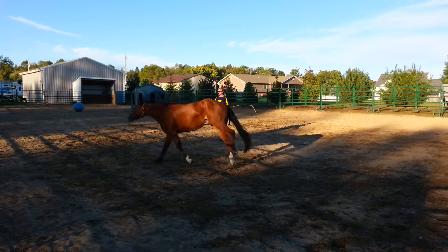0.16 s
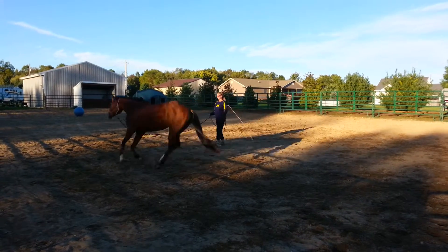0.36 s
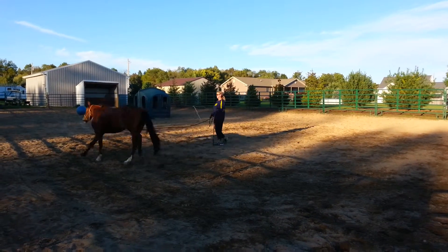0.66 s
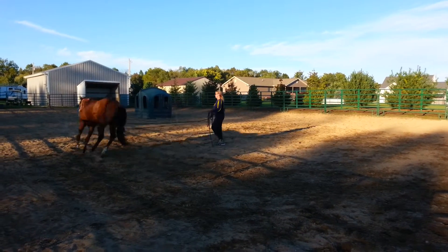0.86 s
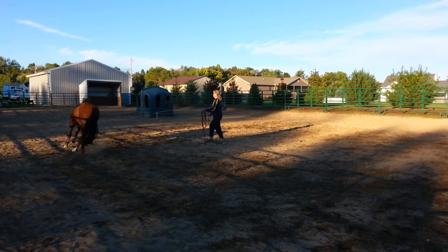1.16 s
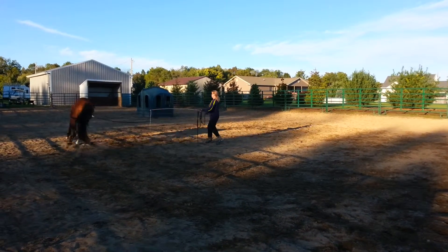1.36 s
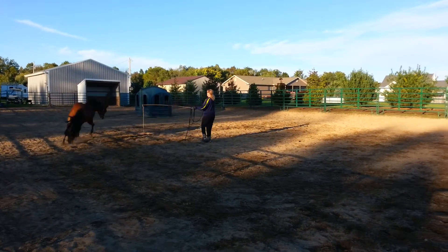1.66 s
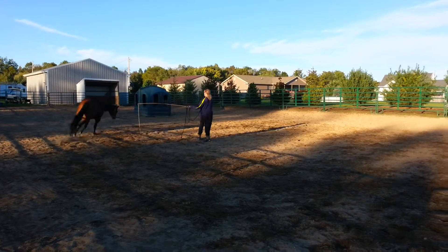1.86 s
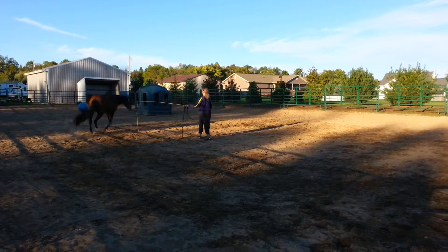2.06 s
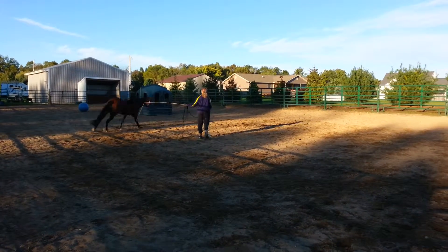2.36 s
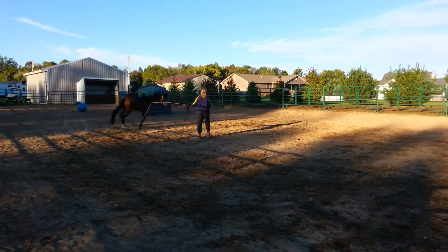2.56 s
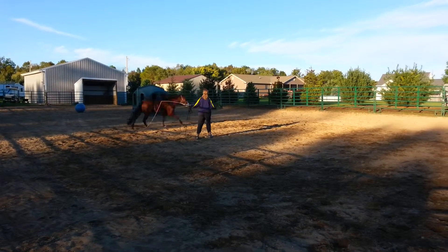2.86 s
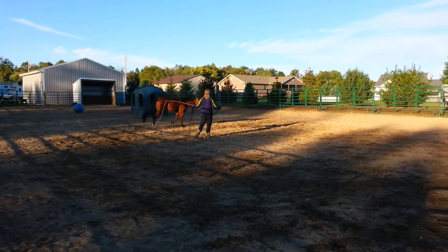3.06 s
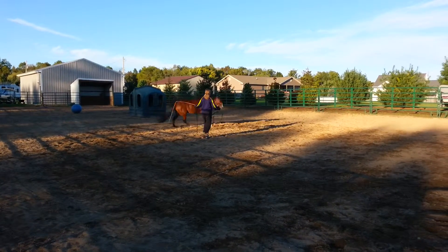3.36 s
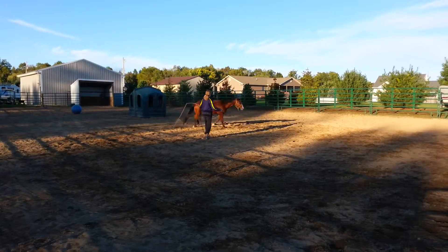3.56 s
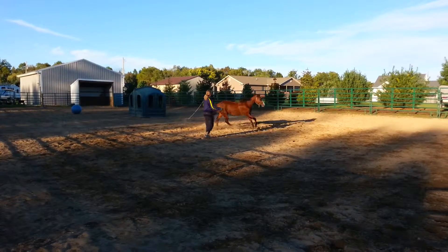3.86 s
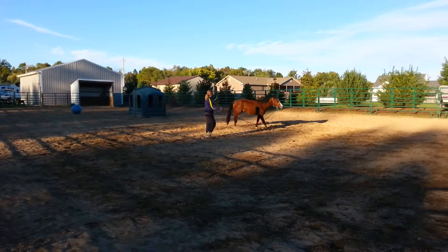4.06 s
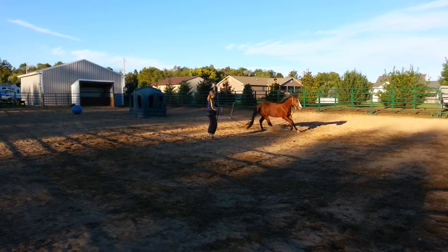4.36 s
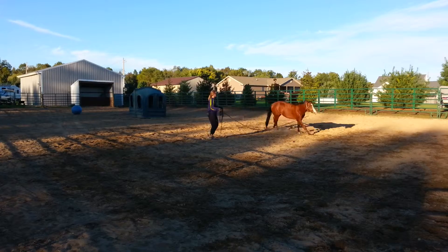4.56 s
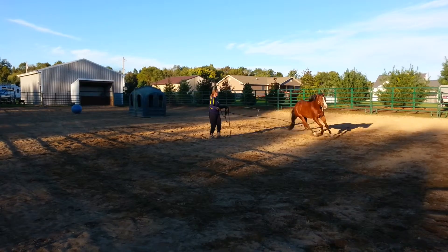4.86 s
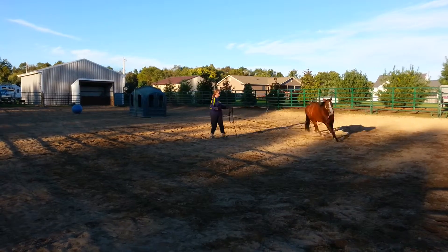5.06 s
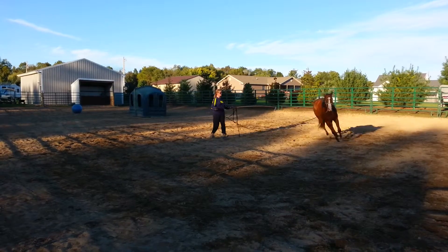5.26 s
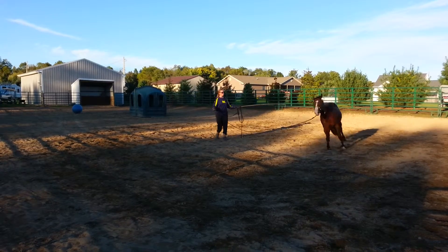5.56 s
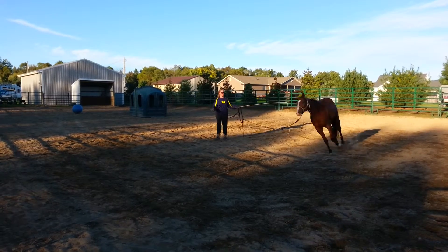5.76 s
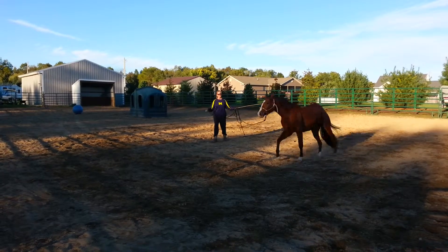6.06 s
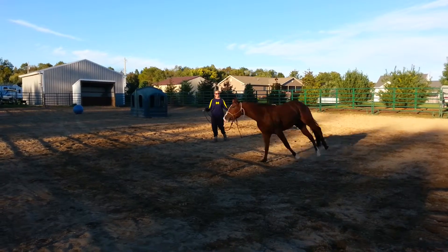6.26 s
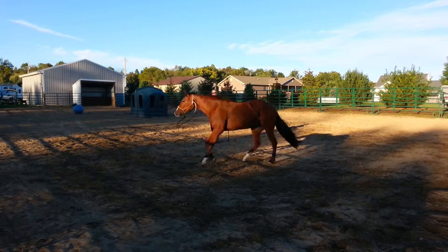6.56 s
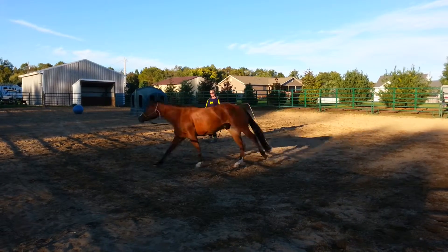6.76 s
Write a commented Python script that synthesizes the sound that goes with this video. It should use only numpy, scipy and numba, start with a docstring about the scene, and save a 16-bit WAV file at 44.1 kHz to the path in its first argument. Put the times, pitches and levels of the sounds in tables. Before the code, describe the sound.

Wind buffets the microphone over far traffic, then eases as a cantering horse's soft hoof thuds and sand spray come through, with tiny bird chirps.

```python
"""A sand paddock beside far traffic, heard from the rail by a microphone with two ports.
A horse canters on a line: hooves thud (falling sines, noise) and throw sand (coloured grains).
The snap hook of the line jingles (decaying steel modes) and small birds call (gliding sines).
A breeze buffets the ports, the left one most (swirling grains), then dies down over the traffic
and a soft hiss (both filtered noise)."""
import sys
import numpy as np
from scipy import signal
from scipy.fft import rfft, irfft
from scipy.io import wavfile
from scipy.ndimage import uniform_filter1d
from numba import njit

SR = 44100
rng = np.random.default_rng(int(sys.argv[2]) if len(sys.argv) > 2 else 0)


def wav_out(sig):
    """Save sig, one row per channel (or a flat mono array), as 16-bit PCM at SR to the path in sys.argv[1]."""
    wavfile.write(sys.argv[1], SR, np.round(np.clip(np.atleast_2d(sig).T, -1, 1) * 32767).astype(np.int16))


N = 305172
T = np.arange(N) / SR
RIGHT_LAG = 18  # samples by which sound reaches the right port later


def undb(db):
    """Gain of a level in dB."""
    return 10 ** (np.asarray(db) / 20)


def unit(x):
    """Scale to rms 1."""
    return x / np.sqrt(np.mean(x ** 2))


def curves(table):
    """Columns of a time table, interpolated to one value a sample."""
    s, *columns = np.transpose(table)
    return [np.interp(T, s, c) for c in columns]


def colour(x, points):
    """Filter a noise through (frequency [Hz], gain [dB]) points, falling steeply beyond the ends."""
    hz, db = np.transpose(points)
    log_hz = np.log(np.maximum(np.arange(N // 2 + 1) * SR / N, 1))
    below = np.maximum(np.log(hz[0]) - log_hz, 0)
    above = np.maximum(log_hz - np.log(hz[-1]), 0)
    gain_db = np.interp(log_hz, np.log(hz), db) - 10.7 * (below + above)
    return irfft(rfft(x) * undb(gain_db), N)


@njit
def svf(x, hz, q):
    """State-variable band-pass with a moving centre, gain 1 there."""
    y, b, l = np.empty(len(x)), 0., 0.
    for i in range(len(x)):
        g = np.tan(np.pi * hz[i] / SR)
        v = (b + g * (x[i] - l)) / (1 + g * (g + 1 / q))
        b, l, y[i] = 2 * v - b, l + 2 * g * v, v / q
    return y


def band(x, hz, width_hz):
    """Fixed band-pass."""
    return svf(x, np.full(N, 1. * hz), hz / width_hz)


def walk(rate):
    """Random levels held 1 / rate s, then smoothed twice; spread near 1."""
    hold = int(SR / rate)
    steps = np.repeat(rng.standard_normal(N // hold + 1), hold)
    return 1.93 * uniform_filter1d(uniform_filter1d(steps, hold), hold)[:N]


def grains(rate, spread_db):
    """Scattered clicks of very uneven size, about rate of them a second, rms 1."""
    hit = rng.random(N) < rate / SR
    return unit(hit * rng.choice([-1, 1], N) * undb(spread_db * rng.exponential(size=N)))


def add(out, s, x):
    """Mix x in from time s."""
    i = max(int(s * SR), 0)
    out[..., i:i + x.shape[-1]] += x[..., :N - i]


def burst(t60, rise):
    """Time and envelope that swells for about rise s, then dies away by 60 dB in t60 s; peak 1."""
    t = np.arange(int(.4 * SR)) / SR
    swell = (1 - np.exp(-t / max(rise, 1e-4))) ** 2
    shape = swell * np.exp(-np.log(1000) * t / max(t60, .002))
    return t, shape / shape.max()


# traffic spectrum: (frequency [Hz], gain [dB])
TRAFFIC_COLOUR = [(40, 10.5), (70, 7), (120, 2.5), (270, 0), (400, -6.5), (950, -11), (1400, -9),
                  (2500, -26.5), (4000, -29.5)]
# tyre roar sinks in pitch as a far car passes, another follows: (time [s], centre [Hz])
TYRE_ROAR = [(0, 802), (2.35, 693), (2.7, 610), (4.0, 640), (4.7, 710)]
ROAR_Q, ROAR_DB = 2.15, 10


def drone():
    """Tyre and engine noise from far off: each slice of the spectrum wavers on its own."""
    noise = rng.standard_normal(N)
    wavering = np.zeros(N)
    for k, hz in enumerate(40 * 2 ** np.arange(0, 7, 1 / 3)):  # third octaves
        waver_db = min(2.1, 1000 / hz) * walk(12)
        # neighbouring slices in opposite phase
        wavering += (-1) ** k * band(noise, hz, hz / 4) * undb(waver_db)
    rumble = colour(wavering, TRAFFIC_COLOUR)
    roar_hz, = curves(TYRE_ROAR)
    roar = svf(svf(rumble, roar_hz, ROAR_Q), roar_hz, ROAR_Q)
    return unit(rumble + undb(ROAR_DB) * roar)


# hiss spectrum: (frequency [Hz], gain [dB])
HISS_COLOUR = [(1800, 2), (4400, 0), (6000, -1.5), (10000, -2.5), (14000, -5.5)]
# far background: (time [s], traffic gain [dB], hiss gain [dB])
FAR_LEVELS = [(0, -48.5, -67.5), (.9, -59, -70), (1.5, -60.5, -66), (1.9, -54, -66), (2, -54.5, -73.5),
              (2.55, -59, -69.5), (2.95, -57.5, -68), (3.2, -59, -67.5), (4.1, -64.5, -69),
              (5.3, -66, -72.5), (5.6, -66.5, -71.5), (6.92, -68.5, -74.5)]


def far():
    """Traffic partly shared by the ports, late at the right, and a hiss that comes from all round."""
    traffic_db, hiss_db = curves(FAR_LEVELS)
    ahead, left, right = drone(), drone(), drone()
    hiss = np.array([unit(colour(rng.standard_normal(N), HISS_COLOUR)) for _ in range(2)])
    road = np.array([ahead + 0.98 * left, np.roll(ahead, RIGHT_LAG) + 0.27 * right])
    sway_db, flicker_db = 1.6 * walk(16), 0.9 * walk(20)
    return road * undb(traffic_db + sway_db) + hiss * undb(hiss_db + flicker_db)


# air between the puffs: (time [s], left level [dB], right level [dB])
AIR_LEVELS = [(0, -48, -55), (.9, -53, -51.5), (1.13, -66, -65), (1.4, -36, -48.5), (2.1, -52, -66),
              (2.7, -84, -61.5), (3.4, -93, -61.5), (4.1, -71.5, -68)]
# puffs of wind on one port: (time at full level [s], hold [s], level [dB], port [0 left, 1 right])
WIND_PUFFS = [(0.0, 0.043, -31.5, 0), (0.046, 0.04, -28, 0), (0.073, 0.096, -46.5, 1),
              (0.162, 0.069, -28, 0), (0.286, 0.034, -36, 0), (0.462, 0.05, -35.5, 0),
              (0.507, 0.13, -51, 1), (0.588, 0.031, -38, 0), (0.725, 0.012, -35.5, 0),
              (0.823, 0.041, -36.5, 0), (1.028, 0.042, -44, 0), (1.176, 0.014, -33, 0),
              (1.187, 0.054, -44.5, 1), (1.262, 0.17, -32, 0), (1.503, 0.16, -32.5, 0),
              (1.662, 0.089, -43, 1), (1.692, 0.089, -38.5, 0), (1.888, 0.046, -42.5, 1),
              (2.194, 0.15, -35, 0), (2.337, 0.033, -41.5, 1), (2.498, 0.019, -39, 0),
              (3.475, 0.027, -39.5, 0), (3.592, 0.047, -44, 0), (3.604, 0.031, -40.5, 1)]
PUFF_RISE_DB_S, PUFF_FALL_DB_S = 797, 340  # dB per second


def wind_db():
    """Wind level on each port: slowly changing air plus puffs that rise, hold and fall away."""
    power = undb(curves(AIR_LEVELS)) ** 2
    for s, hold, db, port in WIND_PUFFS:
        rise_db = PUFF_RISE_DB_S * np.maximum(s - T, 0)
        fall_db = PUFF_FALL_DB_S * np.maximum(T - s - hold, 0)
        power[int(round(port))] += undb(db - rise_db - fall_db) ** 2
    return 10 * np.log10(power)


# strongest single eddies: (time [s], level before filtering [dB], pitch [Hz], port [0 left, 1 right])
STRONG_EDDIES = [(0.062, -18, 170, 0), (0.177, -19.5, 191, 0), (0.217, -20.5, 140, 0),
                 (0.324, -16.5, 162, 0), (0.36, -20.5, 125, 0), (1.19, -16.5, 182, 0), (1.292, -20, 110, 0),
                 (1.325, -13.5, 133, 0), (1.412, -14.5, 181, 0), (1.533, -16.5, 123, 0),
                 (1.563, -14.5, 197, 0), (1.586, -19.5, 198, 0), (1.667, -18, 201, 0), (1.921, -25, 161, 1),
                 (2.215, -22.5, 140, 0), (2.304, -27, 140, 0), (2.862, -35, 125, 0), (2.923, -38.5, 170, 0),
                 (3.007, -30.5, 132, 1), (3.5, -25, 140, 0)]


def breeze():
    """Eddies tumble past each port on their own; a stronger gust swirls higher and rustles at the rim."""
    out, rustle = np.zeros((2, 2, N))
    for port, rim, db in zip(out, rustle, wind_db()):
        swirl_hz = np.clip(75 * 2 ** ((db + 46.0) / 40 + 0.22 * walk(24.95)), 40, 400)
        eddies = unit(svf(svf(grains(170, 3.77), swirl_hz, 1.0), swirl_hz, 0.89))
        heave = unit(band(rng.standard_normal(N), 60, 33))
        # the port chokes on the largest swings
        choked = 2.74 * np.tanh(eddies / 2.32)
        port += (choked + undb(-7.0) * heave) * undb(db)
        rim += unit(band(grains(3000, 2.3), 870, 630)) * undb(0.51 * db - 43.5)
    for s, db, hz, port in STRONG_EDDIES:
        t = np.arange(-SR // 50, SR // 50) / SR
        swirl = np.exp(-(t * hz / 0.45) ** 2) * np.sin(2 * np.pi * hz * t - 0.6)
        add(out[int(round(port))], s - .021, undb(db) * swirl)
    low_pass = signal.butter(4, 430, fs=SR, output="sos")
    return signal.sosfilt(low_pass, out) + rustle


# bird notes: (time [s], length [s], start pitch [Hz], end pitch [Hz], level before the waver [dB])
BIRD_NOTES = [(0.006, 0.035, 8500, 8200, -63.5), (0.036, 0.026, 8200, 8540, -60),
              (1.839, 0.054, 9050, 8270, -65), (2.89, 0.07, 4100, 3980, -75),
              (3.155, 0.035, 7450, 7380, -66), (3.285, 0.06, 3980, 3840, -73),
              (3.854, 0.05, 3980, 4100, -76), (4.845, 0.03, 3520, 3610, -72),
              (5.722, 0.032, 7150, 6850, -65), (6.662, 0.02, 3930, 3900, -74)]


def birds():
    """Thin whistles that glide quickly at first, then level off, never quite steady."""
    out, waver = np.zeros(N), walk(120)
    for s, length, start_hz, end_hz, db in BIRD_NOTES:
        n = int(length * SR)
        shake = waver[int(s * SR):][:n]
        glide_hz = end_hz + (start_hz - end_hz) * np.linspace(1, 0, n) ** 2
        hz = glide_hz * (1 + .012 * shake)
        whistle = np.hanning(n) * np.sin(2 * np.pi * np.cumsum(hz) / SR)
        add(out, s, undb(db + 1.6 * shake[::-1]) * whistle)
    return out


# steel modes of the snap hook: (frequency [Hz], relative level [dB], t60 [s])
HOOK_MODES = [(6970, -6.5, 0.027), (7450, 0, 0.029), (8120, -13, 0.03), (9590, -0.5, 0.029),
              (11700, -19, 0.03), (12720, -33, 0.21)]
# the hook knocks its ring: (time [s], level before the mode mix [dB], brightness [dB per octave])
HOOK_KNOCKS = [(0.586, -56.5, -8), (0.606, -60, 27), (0.8664, -57.5, 28), (1.5878, -58.5, 18),
               (2.05, -64.5, -3), (3.217, -56, -24), (6.224, -70, 32), (6.4208, -47.5, 3), (6.557, -67, 22)]


def hook():
    """Every knock rings the same steel modes, each time in another mix."""
    out = np.zeros(N)
    mix = rng.standard_normal((len(HOOK_KNOCKS), len(HOOK_MODES)))
    for (s, db, bright_db), row in zip(HOOK_KNOCKS, mix):
        for (hz, mode_db, t60), chance in zip(HOOK_MODES, row):
            t, shape = burst(t60, 0.00035)
            tilt_db = bright_db * np.log2(hz / 7600)
            ring = shape * np.sin(2 * np.pi * hz * t + chance)
            add(out, s, undb(db + mode_db + tilt_db + 1.6 * chance) * ring)
    return out


# sand spectrum: (frequency [Hz], gain [dB])
SAND_COLOUR = [(700, 7), (1500, -0.5), (3000, 0.5), (6000, -0.5), (10000, -2), (14000, -8.5)]
# sand thrown by the hooves:
# (time [s], shower level [dB], decay t60 [s], first crack above the shower, before its filter [dB])
SAND_SPRAYS = [(0.368, -51, 0.033, -6.5), (0.5724, -56.5, 0.19, 4), (0.8072, -60, 0.11, -1),
               (0.856, -60.5, 0.25, 8), (0.977, -61, 0.087, 7), (1.023, -65, 0.23, 18.5),
               (1.19, -61, 0.12, 4), (1.422, -66, 0.098, 14.5), (1.551, -58, 0.16, 8),
               (1.8542, -71, 0.37, 17), (2.2325, -60.5, 0.13, -5), (3.02, -65.5, 0.089, -2),
               (3.152, -61, 0.11, 4), (3.219, -61, 0.19, 11), (3.537, -62, 0.095, 12.5),
               (3.7402, -67, 0.11, 13), (4.0694, -60.5, 0.12, 15), (4.155, -64, 0.18, 17.5),
               (4.647, -69, 0.071, 15), (4.711, -70, 0.057, 5), (4.797, -70, 0.13, 6),
               (4.818, -64.5, 0.19, 16.5), (4.9404, -64.5, 1, 14.5), (5.155, -64.5, 0.72, 10.5),
               (5.392, -66.5, 0.1, 2), (5.65, -68.5, 0.06, 14), (5.668, -63, 0.048, 5),
               (5.682, -62.5, 0.046, 15.5), (5.901, -66, 0.17, 3), (6.098, -63, 0.12, 15),
               (6.224, -59, 0.11, 20.5), (6.411, -54.5, 0.13, -6), (6.548, -64.5, 0.067, 3),
               (6.88, -65, 0.035, -6)]
SCUFF_DB, SCUFF_SPREAD_DB = -73, 7  # softest scuff, range above it


def sprays():
    """A clod cracks apart, then grains shower over a wide patch, so each port hears its own."""
    shower, crack = np.zeros(N), np.zeros(N)
    for s, db, t60, crack_db in SAND_SPRAYS:
        add(shower, s, undb(db) * burst(t60, 0.0069)[1])
        add(crack, s + 0.00157, undb(db + crack_db) * burst(0.0085, 0.0001)[1])
    # lesser scuffs fall at random times
    for s, size in rng.random((40, 2)):
        add(shower, s * T[-1], undb(SCUFF_DB + SCUFF_SPREAD_DB * size) * burst(0.17, 0.013)[1])
    both, left, right = (unit(colour(grains(4000, 2.32), SAND_COLOUR)) for _ in range(3))
    patter = shower * undb(1.25 * walk(150))
    crack_band = signal.butter(2, [3800, 10000], "band", fs=SR, output="sos")
    snap = signal.sosfilt(crack_band, crack * rng.choice([-1, 1], N))
    return snap + 0.1 * patter * both, patter * np.array([left, right])


# hoof beats: (time [s], thud level at the hoof [dB], thud start pitch [Hz], knock above the thud [dB])
HOOF_BEATS = [(0.498, -30.5, 162, -25), (2.244, -35.5, 150, -25), (2.476, -30, 215, -21),
              (2.802, -42.5, 174, -14), (3.911, -50, 300, -21), (3.981, -46, 194, -23),
              (4.521, -41, 183, -9), (4.647, -52.5, 231, -31.5), (5.1798, -30.5, 270, 1),
              (5.7328, -40, 204, 0.5), (6.079, -50.5, 143, -13), (6.29, -46, 199, 0),
              (6.3039, -33, 188, -8), (6.653, -49, 294, -5.5), (6.689, -59, 200, -13),
              (6.896, -26.5, 249, -11)]


def hooves():
    """The knock of the hoof wall, a short falling thud, and a late boom through the packed ground."""
    out = np.zeros(N)
    rumble = unit(band(rng.standard_normal(N), 258, 90))
    crunch = unit(band(band(grains(900, 3.6), 1200, 1200), 1270, 1500))
    for onset, db, hz, knock_db in HOOF_BEATS:
        s = onset + 0.0015  # the sand gives a moment before it stops the hoof
        t, shape = burst(0.016, 0.0031)
        thud = shape * np.sin(2 * np.pi * hz * t * (1 - 12 * t))
        add(out, s, undb(db) * thud)
        t, shape = burst(0.0068, 0.0006)
        knock = shape * np.sin(2 * np.pi * 600 * t)
        add(out, s, undb(db + knock_db) * knock)
        t, shape = burst(0.056, 0.013)
        boom = shape * np.sin(2 * np.pi * 85 * t)
        add(out, s, undb(db - 13.5) * boom)
        t, shape = burst(0.17, 0.00019)
        i = np.minimum(int(s * SR) + np.arange(len(t)), N - 1)
        add(out, s, undb(db - 20.0) * shape * rumble[i])
        # the toe starts to grind through the grit just before it lands
        add(out, s - 0.013, undb(0.28 * db - 57) * burst(0.16, 0.0023)[1] * crunch[i])
    return out


def scene():
    """The paddock, nearer the left port; fences and sheds smear its sound but return little bass."""
    sand, scattered = sprays()
    near = hooves() + sand + hook() + birds()
    t, tail = burst(0.05, 0.0019)
    thin = signal.sosfilt(signal.butter(2, 450, "high", fs=SR, output="sos"), near)
    echo = []
    for _ in range(2):  # one for each port
        smear = undb(-25.0) * tail * rng.standard_normal(len(t))
        echo.append(signal.fftconvolve(thin, smear)[:N])
    direct = np.array([undb(3.0) * near, undb(1.5) * np.roll(near, RIGHT_LAG)])
    return direct + echo + scattered + far() + breeze()


# cavity resonances of each microphone port: (centre [Hz], width [Hz], gain [dB])
LEFT_CAVITY = [(5336, 740, 6)]
RIGHT_CAVITY = [(7090, 850, 12.75), (8236, 750, 18.16), (10760, 1300, 0.97)]
TOP_HZ = 14700


def record(dry):
    """Ports add cavity resonances, neighbours in opposite phase; the recorder cuts deep bass and top."""
    ported = []
    for x, cavity in zip(dry, (LEFT_CAVITY, RIGHT_CAVITY)):
        resonance = np.zeros(N)
        for k, (hz, width_hz, db) in enumerate(cavity):
            resonance += (-1) ** k * undb(db) * band(x, hz, width_hz)
        ported.append(x + resonance)
    thin = signal.sosfilt(signal.butter(2, 55, "high", fs=SR, output="sos"), ported)
    return signal.sosfilt(signal.ellip(10, .2, 70, TOP_HZ, fs=SR, output="sos"), thin)


dry = scene()
out = record(dry)
wav_out(out)
```